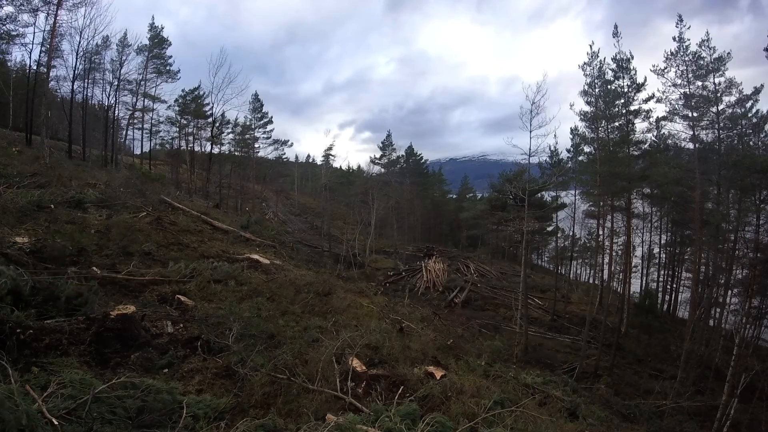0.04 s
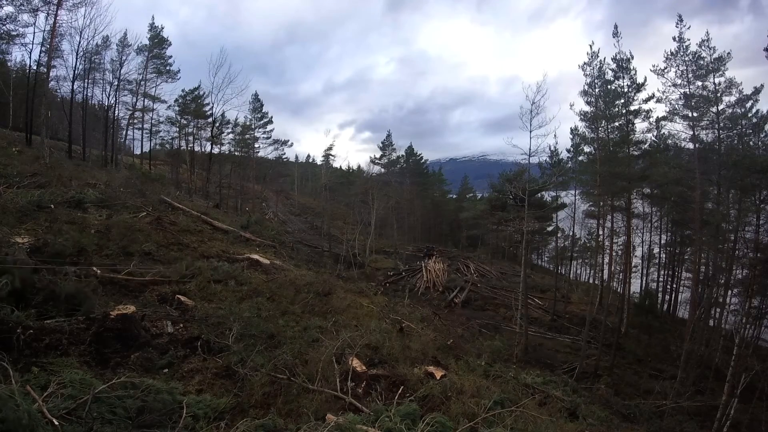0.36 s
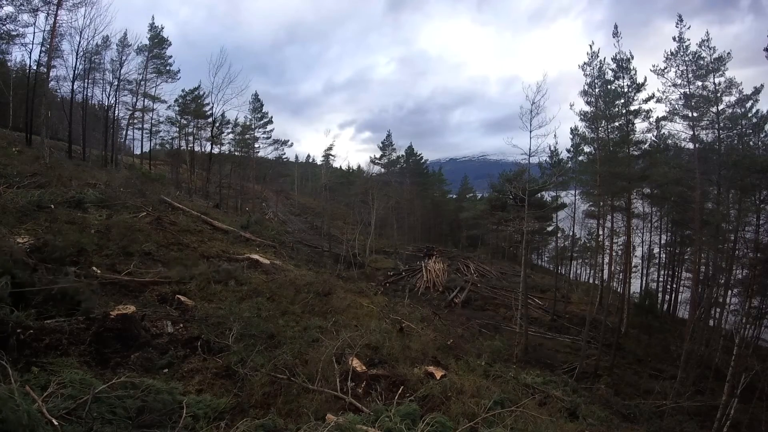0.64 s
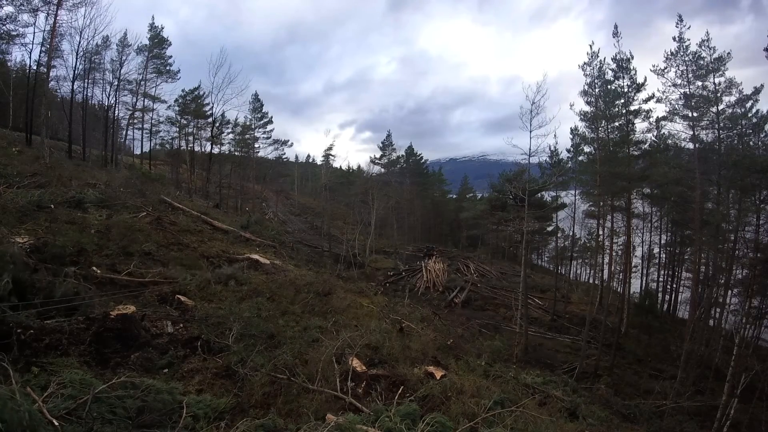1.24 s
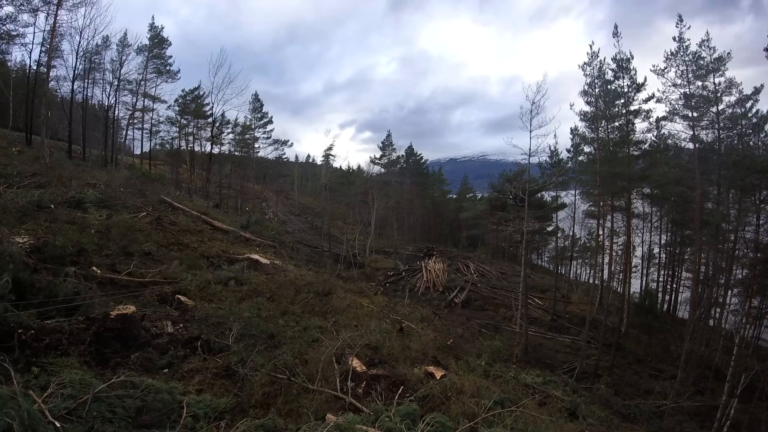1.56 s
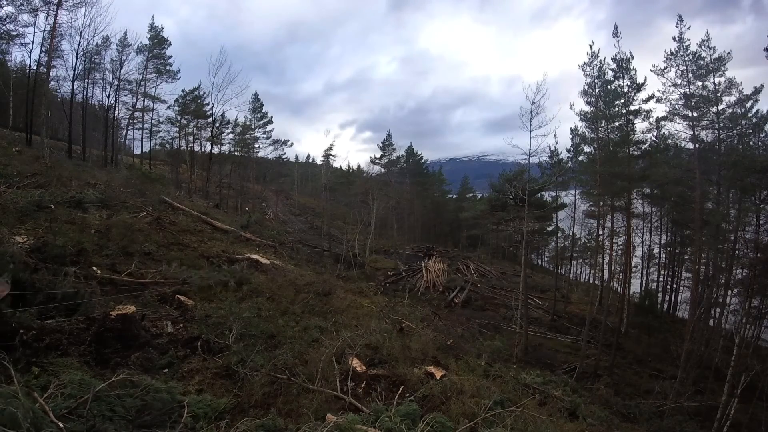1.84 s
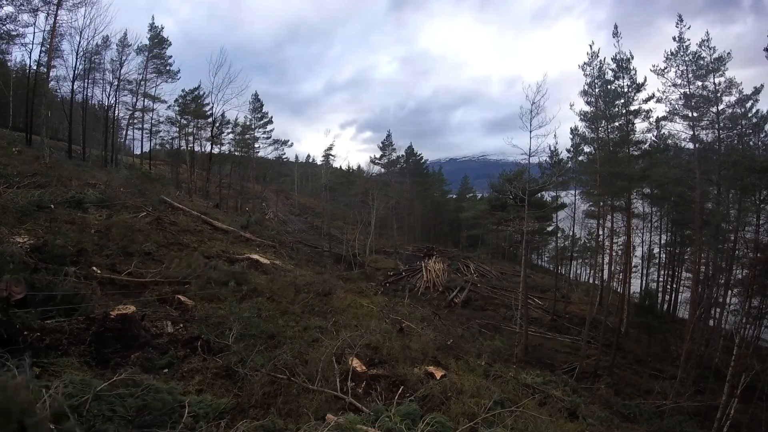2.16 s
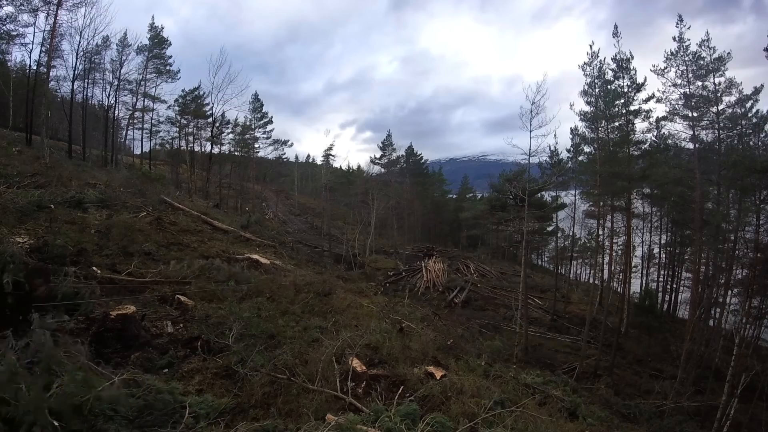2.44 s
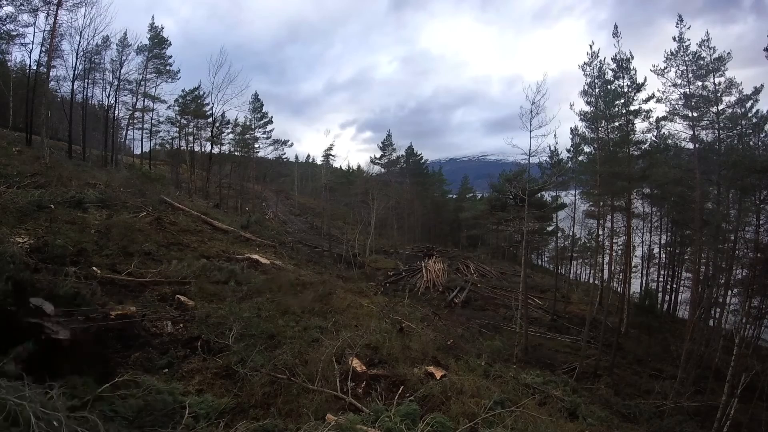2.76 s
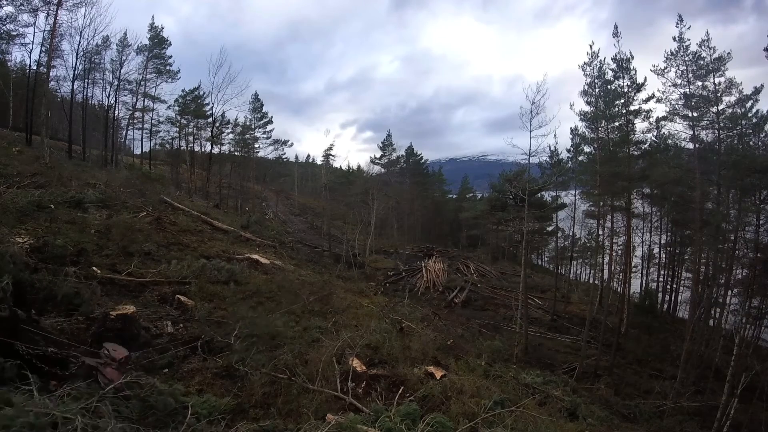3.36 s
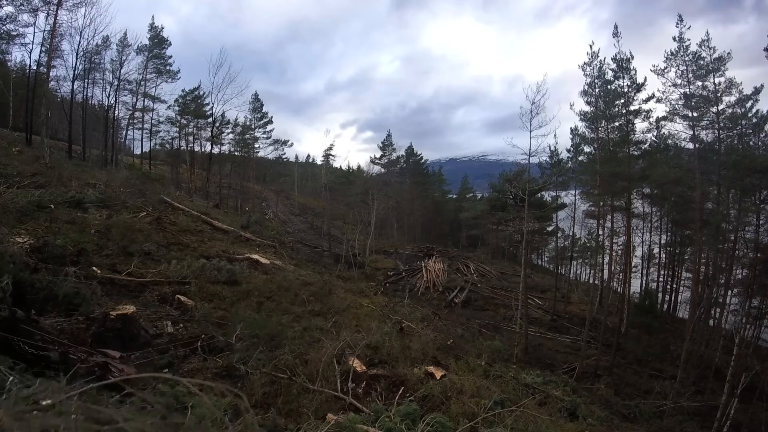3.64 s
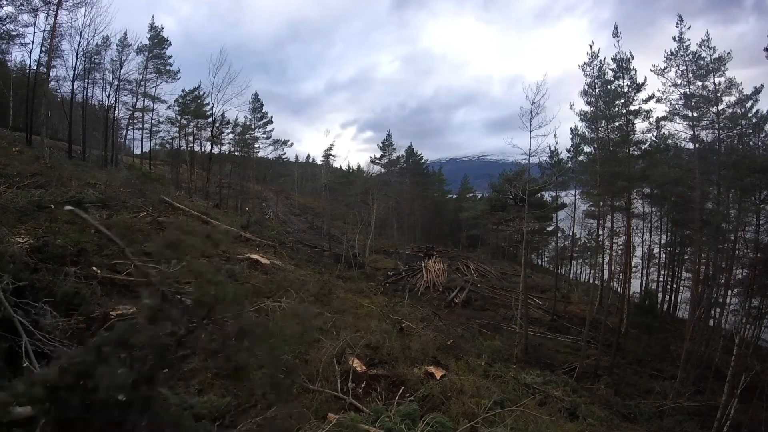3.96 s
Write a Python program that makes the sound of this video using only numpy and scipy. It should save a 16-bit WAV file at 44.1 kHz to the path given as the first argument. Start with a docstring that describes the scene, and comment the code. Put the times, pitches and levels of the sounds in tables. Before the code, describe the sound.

Logs and branches knock and rattle as they are hauled on an open hillside. Scattered close, hollow knocks build into a dense clatter, then thin out. Small metal clinks, faint twig rustle and a low rumble of air accompany them.

```python
"""Wood knocks and scrapes in short bursts as logs and branches are hauled about on a cleared hillside.
Each burst is a run of tiny contacts that ring a hollow body close to the microphone, probably its
housing. Small metal parts, perhaps chain links, clink among the knocks, and a shifting log bumps softly.
Underneath lie a faint rustle of dragged twigs and the low rumble of the open air."""
import sys
import numpy as np
from scipy import signal
from scipy.fft import rfft, irfft
from scipy.io import wavfile
from scipy.ndimage import uniform_filter1d

SR = 44100
rng = np.random.default_rng(int(sys.argv[2]) if len(sys.argv) > 2 else 0)


def log_audio(samples):
    """Write samples as a 16-bit WAV file to the path given in sys.argv[1]."""
    # one column per channel
    frames = np.atleast_2d(samples).T
    # limit to full scale, then quantise
    limited = np.clip(frames, -1, 1)
    pcm = np.round(limited * 32767).astype(np.int16)
    wavfile.write(sys.argv[1], SR, pcm)


N = 176400


def knocks():
    """Wood strikes wood: a burst of contacts swells, falls and trails off in chatter."""
    # wood knocks: peak t/s, relative level/dB of body, clack, crack and sizzle, swell/s, branch f/Hz
    hits = [(0.4888, -50, -61, -75, -83, 0.00064, 2800), (0.716, -39, -43, -54, -76, 0.002, 2980),
            (0.7216, -36, -42, -56.5, -74, 0.0024, 2900), (0.781, -40.5, -57.5, -64, -90, 0.00028, 3120),
            (0.7864, -41.5, -48.5, -65, -80, 0.0029, 3200), (0.813, -46, -42, -54, -76, 0.001, 2640),
            (0.8332, -38, -36, -51, -79, 0.0011, 2616), (0.876, -47.5, -47, -58, -77, 0.0012, 3430),
            (0.9077, -56, -42, -46.5, -65, 0.00086, 2820), (0.912, -43, -55, -49, -70, 0.0021, 2680),
            (0.9416, -43.5, -46, -44, -59, 0.0014, 2880), (0.9514, -47, -45.5, -56, -64, 0.0068, 2870),
            (0.9636, -43.5, -51, -49, -65, 0.0024, 3380), (0.9767, -50, -53, -68, -80, 0.0033, 2800),
            (1.009, -43, -49, -52.5, -66, 0.0016, 2700), (1.1456, -53.5, -69.5, -78, -84, 0.00037, 2160),
            (1.44, -50, -57.5, -70, -85, 0.0003, 2940), (1.4875, -47.5, -52, -68, -79, 0.0014, 2770),
            (1.8258, -49, -41.5, -68, -62, 0.00025, 2440), (1.826, -47, -36, -42.5, -45.5, 0.0021, 2390),
            (1.843, -44.5, -44.5, -50, -57, 0.0015, 2730), (1.8754, -64, -50, -61, -69, 0.00069, 2290),
            (1.89, -50, -59, -69, -82, 0.00062, 2660), (1.9179, -54, -69, -65, -60, 0.0025, 3550),
            (1.9238, -52.5, -70, -60, -67, 0.0019, 2940), (2.049, -48, -63, -76, -82, 0.0006, 2400),
            (2.1686, -54, -41, -41.5, -60, 0.00046, 3440), (2.2124, -61, -50.5, -54.5, -63, 0.00034, 3200),
            (2.4642, -43.5, -54.5, -60, -79, 0.00031, 2880), (2.5653, -53, -50, -61, -72, 0.00054, 2260),
            (2.6072, -39, -47.5, -57.5, -74, 0.00032, 2900), (2.6897, -49.5, -49, -57, -69, 0.0034, 2950),
            (2.7867, -41.5, -51, -64, -80, 0.0018, 2300), (2.799, -36, -43.5, -57, -76, 0.0018, 2840),
            (2.8181, -24, -34, -42.5, -55, 0.003, 2980), (2.8278, -37, -39, -44, -49.5, 0.0025, 2710),
            (2.841, -38, -35.5, -46, -57, 0.0025, 2960), (2.845, -26, -31, -46, -50, 0.00057, 3370),
            (2.8556, -35, -39, -50, -67, 0.0058, 3400), (2.865, -42, -48, -42, -62, 0.0029, 2970),
            (2.8727, -33, -47, -56, -66, 0.00047, 3200), (2.8774, -35, -37, -49, -60, 0.0049, 3200),
            (2.8847, -31, -44, -46, -64, 0.0029, 3120), (2.8963, -40.5, -56, -49, -72, 0.001, 3010),
            (2.9129, -22, -49, -41.5, -47, 0.0019, 2830), (2.919, -27.5, -30, -48.5, -52, 0.00066, 2770),
            (2.9251, -31, -34, -34, -54, 0.0032, 2180), (2.9457, -33, -42, -48, -60, 0.0056, 2960),
            (3.0063, -33, -51, -48, -66, 0.0008, 2340), (3.0163, -34, -38, -45, -64, 0.0054, 3400),
            (3.038, -42, -40, -55, -62, 0.0017, 3840), (3.0624, -30.5, -34, -46, -62, 0.005, 2240),
            (3.0688, -34, -38.5, -43.5, -63, 0.0028, 3500), (3.086, -37, -43, -50, -72, 0.00048, 2890),
            (3.1075, -44.5, -43, -49, -63, 0.0029, 3014), (3.1227, -35.5, -39, -60, -73, 0.0011, 2330),
            (3.1324, -37, -40, -56, -75, 0.00087, 2400), (3.181, -40, -42.5, -45, -57, 0.0021, 2940),
            (3.2, -41, -40, -44, -58, 0.0033, 2340), (3.2108, -33, -40, -58, -57, 0.0023, 2370),
            (3.2151, -36, -38, -42, -64, 0.0036, 2180), (3.226, -34, -50, -54, -63, 0.0025, 3430),
            (3.2335, -36, -51, -54, -77, 0.00076, 2320), (3.2533, -36, -24.5, -29.5, -41.5, 0.0022, 2860),
            (3.267, -45, -43, -52, -60, 0.0015, 3180), (3.278, -41, -51, -56, -65, 0.0025, 2286),
            (3.2966, -65, -44.5, -58, -60, 0.0043, 3390), (3.3846, -42.5, -45.5, -71, -82, 0.0011, 2360),
            (3.4602, -55, -56, -63, -60, 0.00058, 2410), (3.54, -65, -36.5, -56, -59, 0.00059, 2970),
            (3.592, -48.5, -52, -71, -81, 0.00045, 3140), (3.623, -34.5, -47.5, -51.5, -75, 0.00039, 2400),
            (3.6607, -49, -47.5, -55.5, -77, 0.0013, 2220), (3.813, -40.5, -38, -58, -73, 0.0051, 2250),
            (3.9792, -41.5, -49, -54, -62, 0.0032, 3160)]
    main_contact_db, chatter_db, trim_db = -2.5, -14, -2.09
    size, window = 4096, 176  # samples
    t = np.arange(size) / SR - .016  # zero at the main contact
    before, after = np.minimum(t, 0), np.maximum(t, 0)
    out = np.zeros(N)
    for peak_s, *levels, swell_s, branch_hz in hits:
        swell = np.exp(before / swell_s)
        fall = np.exp(-after / (.0012 + .44 * swell_s))  # quick snaps also end quickly
        chatter = undb(chatter_db) * np.exp(-after / (8.2 * swell_s))
        force = swell * (fall + chatter) * contacts(per_s=3200, spread_db=4.5, size=size)
        force[np.argmin(abs(t))] += undb(main_contact_db)
        splinters_hz = rng.uniform(4645, 11600, size=6)
        bands = hollow_body(force, [branch_hz, *splinters_hz], width_hz=130, note_db=4)
        knock = np.zeros(size)
        for band, db in zip(bands, levels):
            peak_rms = np.sqrt(uniform_filter1d(band ** 2, window).max())
            knock += band * undb(db + trim_db) / peak_rms
        loudest_s = np.argmax(uniform_filter1d(knock ** 2, window // 2)) / SR
        add(out, peak_s - loudest_s, knock)
    return out


def hollow_body(force, notes_hz, width_hz, note_db):
    """A force rings the wood's notes and the body by the microphone; gives body, clack, crack, sizzle."""
    # modes of the hollow body: f/Hz, width/Hz, relative level/dB, polarity
    modes = [(850, 320, -27, 1), (1456.6, 200, 5, -1), (1686, 210, 1.5, 1), (2254, 460, -8, 1),
             (2902, 230, -5.5, -1), (3376, 380, -8, -1), (3878, 193, -13, 1), (5270, 700, -10.5, 1),
             (5533, 224, -7.5, -1), (5994, 217, -13, 1), (7470, 740, -21.5, -1), (8420, 650, -22.5, 1),
             (10580, 920, -29, -1), (12300, 3500, -37, 1)]
    band_edges_hz = 2143, 4080, 7620
    hz = np.fft.rfftfreq(len(force), 1 / SR) + 1e-3
    body = sum(np.sign(polarity) * undb(db) * resonance(hz, f, width) for f, width, db, polarity in modes)
    wood = 1 + undb(note_db) * sum(resonance(hz, f, width_hz) for f in notes_hz)
    low_shelf = undb(-5 * below(hz, 1500))  # the body passes less below its first strong mode
    spectrum = rfft(force) * body * wood * low_shelf
    shares = np.diff([below(hz, edge) for edge in band_edges_hz], axis=0, prepend=0, append=1)
    return [irfft(spectrum * share, len(force)) for share in shares]


def clinks():
    """Small metal parts touch with a faint tick and ring briefly on one or a few partials."""
    # partials of the metal parts: t/s, f/Hz, level/dB, t60/s
    partials = [(.487, 5530, -63, 0.087), (0.565, 3440, -40, 0.21), (0.569, 7330, -62, 0.77),
                (.615, 4883, -61.5, 0.47), (.568, 7946, -67, 0.5), (0.941, 5580, -34.5, 0.038),
                (0.94, 8420, -42, 0.041), (1.075, 5660, -61, 0.11), (1.275, 8100, -66, .08),
                (1.909, 5950, -39, 0.028), (1.916, 5480, -55, 0.12), (2.947, 6060, -41, .04),
                (3.035, 8500, -51.5, .1), (3.108, 8280, -44.5, .06), (3.276, 6000, -39, 0.023),
                (3.294, 6000, -44, 0.053), (3.294, 4120, -43.5, .07), (3.324, 5570, -45.5, 0.052),
                (3.495, 6150, -46, 0.034), (3.495, 10800, -62, 0.097), (3.777, 5590, -36.5, 0.085),
                (3.774, 3612, -37.5, 0.08), (3.773, 8270, -58, 0.21), (3.839, 5670, -44, 0.028),
                (3.951, 8940, -55, 0.063), (3.971, 5220, -43.5, .06)]
    tick_db, tick_decay_s = -14, .003
    tick_band = signal.butter(2, [3000, 9000], "band", fs=SR, output="sos")
    out, t = np.zeros(N), np.arange(SR // 20) / SR
    for start, hz, db, t60 in partials:
        add(out, start, ping(hz, db, rise_s=.0011, t60_s=t60))
        tick = signal.sosfilt(tick_band, rng.standard_normal(len(t)))
        add(out, start, undb(db + tick_db) * tick * np.exp(-t / tick_decay_s))
    return out


def bumps():
    """A log gives a few soft, low knocks as it starts to move."""
    # dull bumps of the log: t/s, f/Hz, level/dB
    thuds = [(2.783, 740, -38), (2.791, 850, -38), (2.814, 620, -40.5), (2.817, 957, -38)]
    out = np.zeros(N)
    for start, hz, db in thuds:
        add(out, start, ping(hz, db, rise_s=.0012, t60_s=.032))
    return out


def rustle():
    """Dragged twigs scrape in an uneven stream of faint contacts through the same hollow body."""
    # course of the rustle: t/s, body level/dB, midrange level/dB, treble level/dB
    course = [(0, -54, -60, -75.5), (.2, -61, -70.5, -78), (.35, -57, -66, -77), (.55, -58.5, -64, -75),
              (.76, -62, -76, -78), (.95, -57.5, -59, -68), (1.2, -63.5, -72, -79.5),
              (1.29, -62.5, -63.5, -75), (1.46, -58, -80, -79), (1.76, -63, -74, -78),
              (1.9, -53.5, -63, -68), (2.02, -64.5, -68.5, -75.5), (2.11, -61, -61, -63.5),
              (2.32, -65, -70, -73.5), (2.76, -59, -64.5, -70.5), (2.85, -47.5, -41.5, -51),
              (2.98, -58, -59.5, -58), (3.22, -46.5, -55, -63), (3.42, -59, -63, -65.5),
              (3.56, -52, -55, -64), (3.73, -57, -58.5, -63.5), (3.85, -50.5, -55, -58.5),
              (4, -58.5, -57, -66)]
    drag_notes_hz, flicker_db, sizzle_db = (1611, 2970), 2, -11
    times, *curves = np.array(course).T
    low, mid, high = (undb(np.interp(np.arange(N) / SR, times, db)) for db in curves)
    force = contacts(per_s=1400, spread_db=4.5, size=N) * undb(flicker_db * walk(rate_hz=45))
    bands = hollow_body(force, drag_notes_hz, width_hz=61, note_db=2.5)
    body, clack, crack, sizzle = map(unit, bands)
    return body * low + clack * mid + (crack + undb(sizzle_db) * sizzle) * high


def air():
    """Steady low rumble and soft hiss of the open hillside."""
    # spectrum of the outdoor background: f/Hz, relative level/dB
    spectrum = [(20, -3.5), (50, 0), (100, -1.5), (200, -4.5), (400, -8.5), (800, -12.5), (1500, -18.5),
                (3000, -17.5), (5000, -28.5), (8000, -31.5), (12000, -39), (16000, -45)]
    rms_db = -57
    points_hz, db = np.array(spectrum).T
    hz = np.fft.rfftfreq(N, 1 / SR) + 1
    colour = undb(np.interp(np.log(hz), np.log(points_hz), db))
    return undb(rms_db) * unit(irfft(rfft(rng.standard_normal(N)) * colour, N))


def contacts(per_s, spread_db, size):
    """Tiny random impacts of uneven strength."""
    touches = rng.random(size) < per_s / SR
    direction = np.sign(rng.standard_normal(size))
    strength = undb(spread_db * np.clip(rng.standard_normal(size), -2.5, 2.5))
    return touches * direction * strength


def resonance(hz, centre_hz, width_hz):
    """Response of one damped mode, gain 1 at its centre."""
    return 1 / (1 + 1j * (hz ** 2 - centre_hz ** 2) / (hz * width_hz))


def below(hz, edge_hz):
    """Steep low-pass gain, one half at the edge."""
    return 1 / (1 + (hz / edge_hz) ** 16)


def ping(hz, db, rise_s, t60_s):
    """One partial that rises quickly and dies away."""
    t = np.arange(SR // 2) / SR
    envelope = (1 - np.exp(-t / rise_s)) * np.exp(-np.log(1000) * t / t60_s)
    return undb(db) * envelope * np.sin(2 * np.pi * hz * t)


def walk(rate_hz):
    """Smooth random wander with rms 1."""
    hold = int(SR / rate_hz)
    steps = np.repeat(rng.standard_normal(N // hold + 1), hold)
    return unit(uniform_filter1d(steps, hold)[:N])


def undb(db):
    """Decibels to gain."""
    return 10 ** (np.asarray(db) / 20)


def unit(x):
    """Scale to rms 1."""
    return x / np.sqrt(np.mean(x ** 2) + 1e-24)


def add(out, start_s, sound):
    """Mix a sound in at a time."""
    i = int(start_s * SR)
    part = sound[:max(N - i, 0)]
    out[i:i + len(part)] += part


def scene():
    """The hauling and the hillside around it, at one microphone."""
    return (air() + rustle() + knocks() + bumps() + clinks())[None]


def record(dry):
    """The recorder cuts the treble steeply above 15.3 kHz."""
    return signal.sosfilt(signal.ellip(10, .2, 70, 15300, fs=SR, output="sos"), dry)


dry = scene()
out = record(dry)
log_audio(out)
```